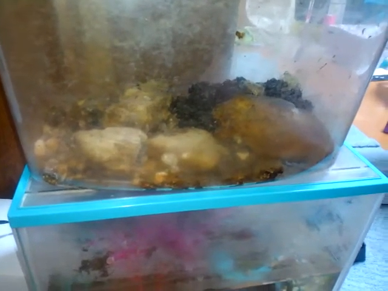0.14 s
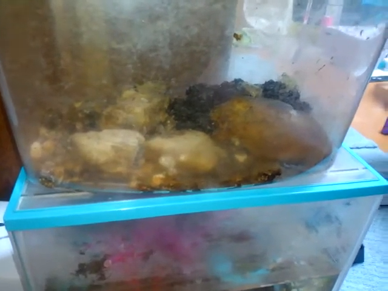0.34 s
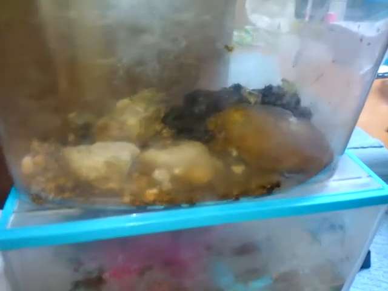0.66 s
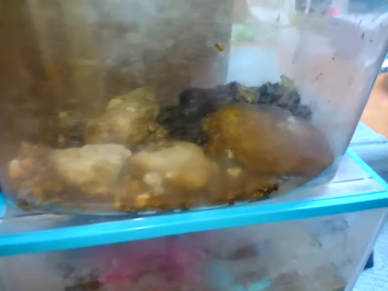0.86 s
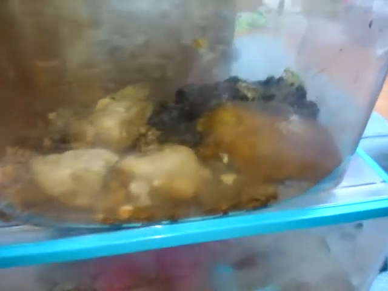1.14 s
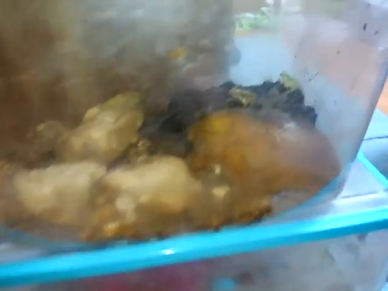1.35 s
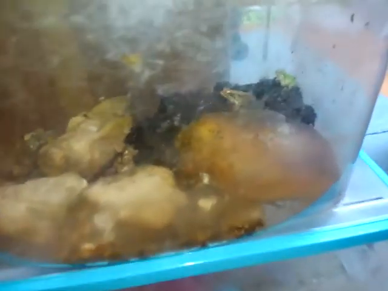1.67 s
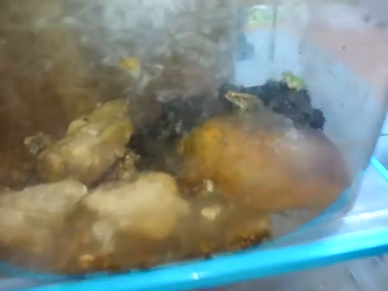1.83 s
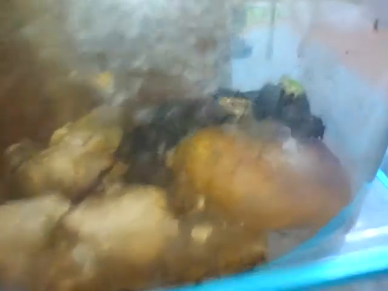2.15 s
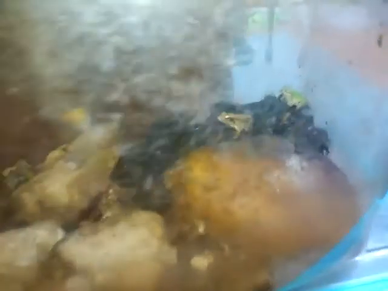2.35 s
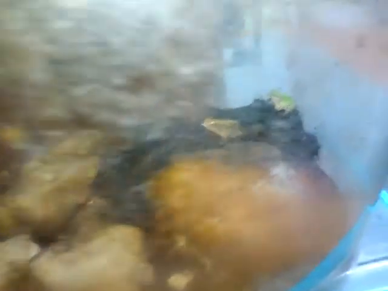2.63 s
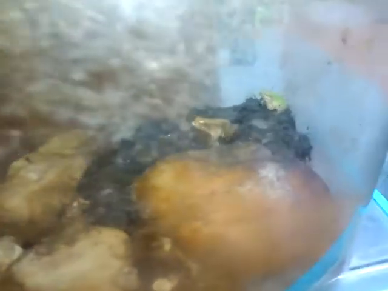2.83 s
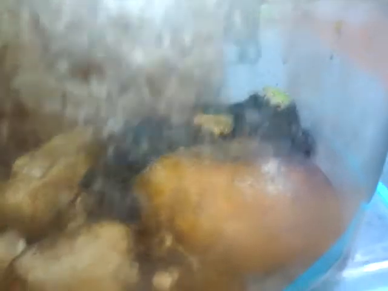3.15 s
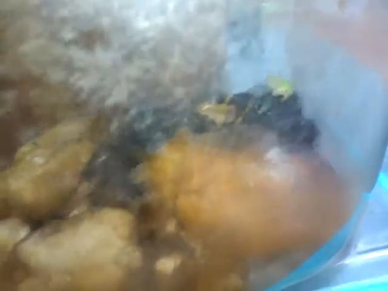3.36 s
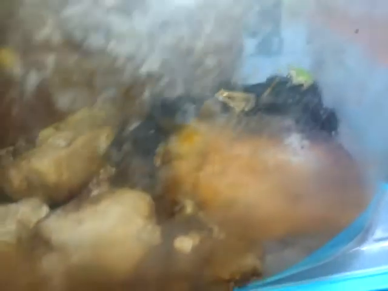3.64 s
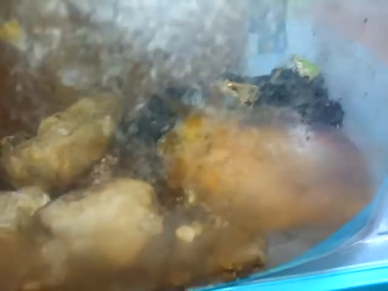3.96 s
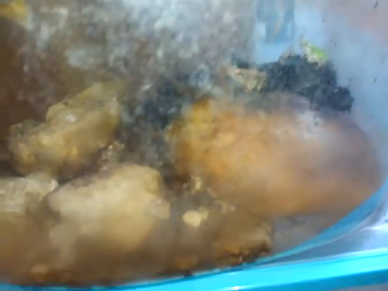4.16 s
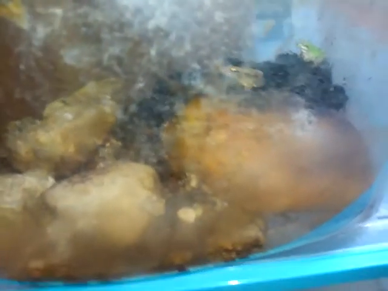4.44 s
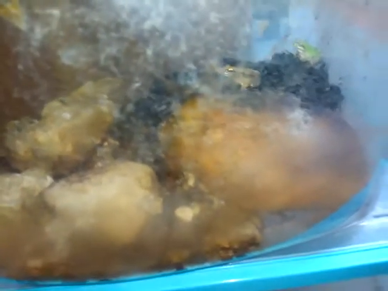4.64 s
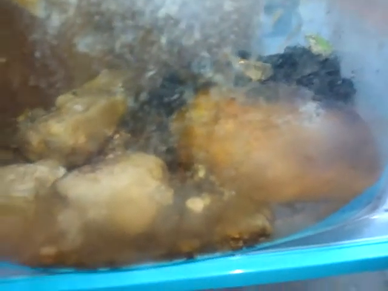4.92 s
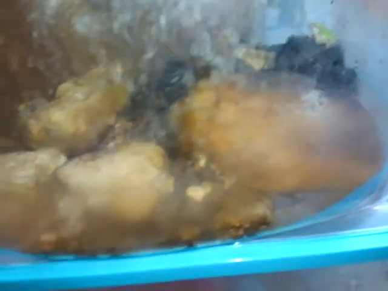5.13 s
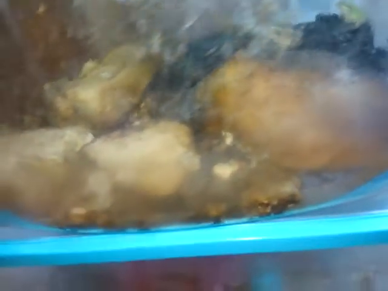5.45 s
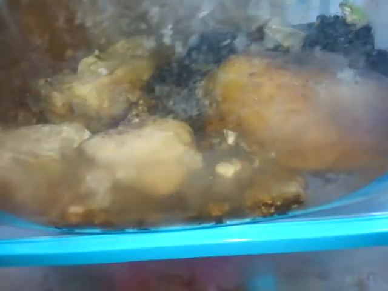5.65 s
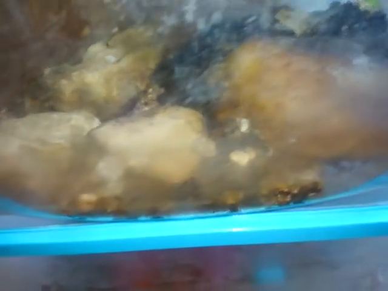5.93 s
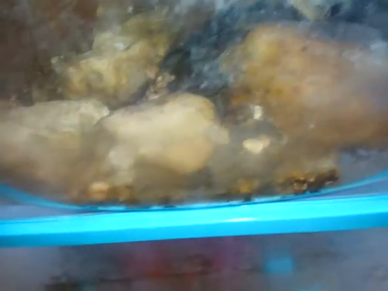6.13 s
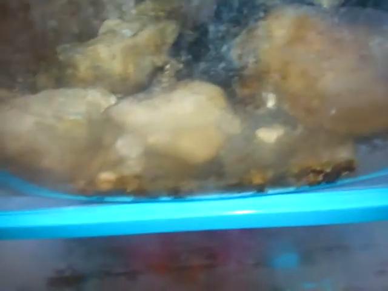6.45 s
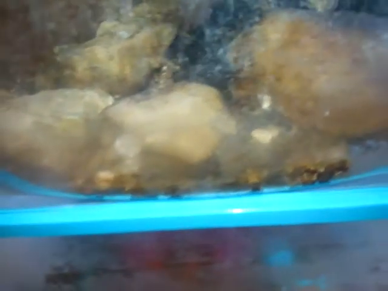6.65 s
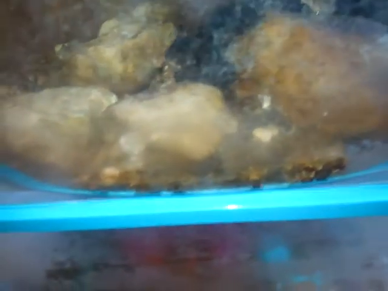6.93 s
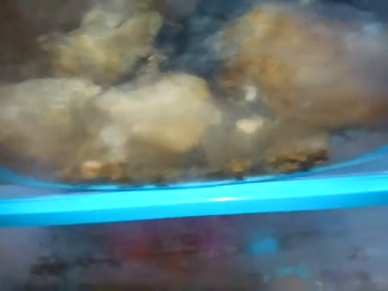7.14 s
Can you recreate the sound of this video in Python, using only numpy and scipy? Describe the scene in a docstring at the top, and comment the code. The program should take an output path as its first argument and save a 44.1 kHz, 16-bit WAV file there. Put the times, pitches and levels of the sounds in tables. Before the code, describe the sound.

A small cricket chirps close by in a plastic tank in a quiet room, from the first instant to the end at about 7.3 seconds, roughly every quarter second. Each chirp lasts about 0.07 seconds: a rapid run of some dozen pulses near 7.3 kilohertz that swells, slows and droops in pitch, with a dry scratchy rasp above and short echoes. Chirps are strong at first, loudest around 1.2, weaker from 1.7 to 3.0, strong again from 3.3 to 5, then mostly softer after 6. The hand-held microphone gets dull low bumps, notably at 0.6, 1.1 to 1.7, 2.0, 2.6, 3.8 and 4.6, and one light hollow plastic knock at 1.2. Tiny dry ticks fall near 2.0, 4.3 and 5.6. A very faint wavering insect trill, chorus and high buzz sit under steady, soft, low room noise.

```python
"""Small cricket in a plastic tank, quiet room

The cricket chirps about four times a second: each chirp is a quick run of wing pulses that swells,
slows and sags in pitch, with a dry rasp of filtered noise above it and echoes off tank and room.
Far insects hold a wavering trill, a chorus and a high buzz, all narrow bands of noise. The hand-held
microphone picks up soft bumps, one ringing knock and a few noise ticks, over steady room noise."""
import sys
import numpy as np
from scipy import signal
from scipy.fft import rfft, irfft
from scipy.io import wavfile

SR = 44100
rng = np.random.default_rng(int(sys.argv[2]) if len(sys.argv) > 2 else 0)


def dump(signal):
    """Clip the signal to [-1, 1] and save it as 16-bit WAV at the path in sys.argv[1]."""
    limited = np.clip(np.atleast_2d(signal).T, -1, 1)
    pcm = np.round(limited * 32767).astype(np.int16)
    wavfile.write(sys.argv[1], SR, pcm)


N = 321489

# colour of the treble that differs between left and right: (frequency [Hz], relative level [dB])
WIDTH = [(2500, -45), (5000, -3), (7200, 8), (9000, 10), (10500, 13), (11700, 9), (13000, -5)]


def cricket(rasp_room_db=-5, rasp_side_db=-13.0, late_side_db=-21):
    """Chirps, heard directly and off the walls; only the rasp and the late echoes have any width."""
    # one row a chirp: (time [s], length [s], direct level [dB], pitch fall [Hz])
    chirps = [(-.034, .066, -30.5, 310), (.2357, .070, -29, 370), (.4883, .070, -29.5, 390),
              (.735, .066, -30.5, 255), (.999, .073, -30, 350), (1.2372, .066, -27.5, 255),
              (1.4554, .066, -29.5, 250), (1.6992, .077, -33, 410), (1.967, .072, -36.5, 495),
              (2.227, .069, -39, 460), (2.4676, .069, -37.5, 380), (2.7583, .067, -34, 345),
              (3.0334, .072, -38, 370), (3.3232, .070, -31.5, 335), (3.597, .071, -30.5, 290),
              (3.849, .070, -30, 290), (4.113, .072, -32, 345), (4.3658, .068, -34, 510),
              (4.6327, .067, -29.5, 300), (4.8896, .065, -30.5, 380), (5.1384, .067, -35.5, 460),
              (5.4145, .068, -34, 440), (5.675, .066, -32.5, 440), (5.9273, .064, -31, 285),
              (6.1776, .077, -35.5, 450), (6.4272, .069, -37.5, 485), (6.6912, .063, -37, 300),
              (6.9438, .074, -36.5, 335), (7.217, .080, -35, 280)]
    # colour of the scraping file: (frequency [Hz], relative level [dB])
    rasp_colour = [(2500, -63), (4200, -19), (5650, -18.5), (6200, -5), (7650, 4), (8150, 0), (8550, 0),
                   (8950, -5.5), (9500, 4), (10400, -1.5), (11000, -3.5), (11700, -11.5), (13000, -25)]
    # the same for every chirp
    rasp_level_db, room_db, twin_db = -50.5, -40.3, -45.3
    room_t60 = 0.19  # s
    pulses_per_s = 240  # at the start of every stroke

    mid, side = np.zeros(N), np.zeros(N)
    # the close walls give every rasp the same fine ring
    tank = amp(-6) * echoes(0.066, 0.0003)
    tank[0] = 1
    for s, length, near_db, fall_hz in chirps:
        crest, pitch_hz = stroke(s, length, near_db, fall_hz)
        tone, twin, scraping = chirp(length, crest, pulses_per_s, pitch_hz, fall_hz)
        twin = amp(twin_db) * twin
        rasp = amp(rasp_level_db) * coloured(passed(scraping, tank), rasp_colour)
        thrown = amp(room_db) * tone + amp(-6) * twin  # what reaches the walls

        start = s - .004  # chirp() begins 4 ms before its first pulse centre
        add(mid, start, amp(near_db) * tone + twin)
        add(mid, start, rasp)
        # the room's echoes change from chirp to chirp as the microphone moves
        add(mid, start, passed(thrown, echoes(room_t60, 0.0026)))
        add(mid, start, amp(rasp_room_db) * passed(rasp, echoes(room_t60, 0.0017)))
        rasp_width = coloured(passed(rasp, echoes(0.052, 0.00035)), WIDTH)
        add(side, start, amp(rasp_side_db) * rasp_width)
        add(side, start, amp(late_side_db) * passed(thrown, echoes(room_t60, .035)))
    return np.array([mid + side, mid - side])


def stroke(s, length, level_db, fall_hz):
    """Crest and pitch of a chirp: strong strokes crest later, long ones earlier; pitch sinks with time."""
    # an ordinary chirp, against which the others are reckoned
    usual_s, usual_db, usual_fall_hz = .069, -33, 365
    # loudest point as a share of the length, moved per dB and per second
    crest = .54 + .012 * (level_db - usual_db) - 17 * (length - usual_s)
    # the pitch sinks 7 Hz per second of song; a chirp that falls further also starts lower
    pitch_hz = 7380 - 7 * s - .24 * (fall_hz - usual_fall_hz)
    return crest, pitch_hz


def chirp(length, crest, rate, pitch_hz, fall_hz):
    """One chirp as (tone, second wing, scraping): every pulse rings both wings briefly and rubs the file."""
    slowing, sag = .013, 3.92  # pulse spacing growth per pulse; power of the late pitch fall
    droop_hz, scatter_hz, twin_hz = 55, 50, 520  # steady fall each way, pulse detuning, second wing below
    uneven_db, slip = 1.0, 0.2  # pulse strength and phase (turns), one standard deviation
    scrape, touch = 0.45, 0.099  # power from pressure to rubbing; pressure at the start

    t = np.arange(-.004, length + .02, 1 / SR)
    k = np.arange(20)
    centres = (k + slowing * k ** 2) / rate  # the pulses spread out through the stroke
    # the wings touch lightly, press harder up to the crest, and part quickly
    press_points = [0, .12, np.clip(crest, .2, .95), .97, 1.06]
    pressures = np.interp(centres / length, press_points, [touch, .2, 1, .8, 0])
    steady_droop = droop_hz * (1 - 2 * t / length)
    late_fall = fall_hz * np.clip(t / length, 0, 1) ** sag
    turns = np.cumsum(pitch_hz + steady_droop - late_fall) / SR

    tone, twin, rub = np.zeros((3, len(t)))
    chances = rng.standard_normal((len(k), 6))
    for n, centre, pressure, chance in zip(k, centres, pressures, chances):
        force, shift, detune, lag, stray, grip = chance
        age = t - centre
        progress = centre / length
        swell = np.cos(np.pi / 2 * np.clip(age * rate / .53, -1, 1))
        # the phase flips at every dip, and slips a little
        ring = np.sin(2 * np.pi * (turns + n / 2 + slip * shift + scatter_hz * detune * age))
        tone += pressure * amp(uneven_db * force) * swell * ring
        # the other wing rings lower and less steadily, mostly late in the stroke
        low_ring = np.sin(2 * np.pi * (lag + (pitch_hz - twin_hz + 140 * stray) * age))
        twin += pressure * progress * swell * low_ring
        rub_force = pressure ** scrape * amp(2.2 * grip - 6 * progress)
        rub += rub_force * np.exp(-(age * rate / 0.58) ** 2)
    # single teeth snag, about 4000 a second
    teeth = rng.standard_normal(len(t)) * (rng.random(len(t)) < 4000 / SR)
    parts = (tone, twin, rub * teeth)
    return [part * np.sqrt(length * SR) / np.linalg.norm(part) for part in parts]


def echoes(t60, delay):
    """A dense tail of reflections with energy 1, setting in after the delay."""
    t = np.arange(int(.35 * SR)) / SR
    onset = np.clip(t / delay - 1, 0, 1)
    tail = rng.standard_normal(len(t)) * amp(-60 * t / t60) * onset
    return tail / np.linalg.norm(tail)


def handling():
    """Dull bumps of the hand on the microphone, a light knock on plastic and a few dry ticks."""
    # soft bumps: (time [s], peak level [dB], pitch [Hz])
    bumps = [(.4, -46.5, 70), (0.585, -38, 65), (1.121, -44.5, 55), (1.168, -44.5, 60), (1.281, -38, 191),
             (1.442, -44, 64.6), (1.663, -42, 52), (2.025, -37.5, 180), (2.607, -41, 65.5),
             (3.845, -44, 49.4), (4.599, -41.5, 60)]
    # what the knocked plastic rings with: (frequency [Hz], relative level [dB], 60 dB decay [s])
    knock_modes = [(556, 4, 0.1), (950, 2, .08), (1190, -8, 0.045), (1530, -7, .025), (2120, -3, 0.018)]
    # colour of the scuff in the knock: (frequency [Hz], relative level [dB])
    scuff_colour = [(300, -4), (900, 0), (2200, -5), (3600, -8), (5000, -20)]
    # faint ticks: (time [s], starting level [dB], decay to 1/e [s])
    ticks = [(1.967, -55, 0.009), (4.286, -54, .012), (4.331, -59, 0.014), (5.595, -54, 0.013),
             (5.612, -61, .01)]
    # colour of the ticks: (frequency [Hz], relative level [dB])
    tick_colour = [(2000, -30), (4500, 3), (8000, -6), (10500, 7), (13000, -9)]
    knock_s, knock_db, scuff_db = 1.207, -51, -52.5

    out, t = np.zeros(N), np.arange(SR // 8) / SR
    lead = t[-1] / 2
    for s, db, hz in bumps:
        swing = 2 * np.pi * hz * (t - lead)
        push_and_pull = swing * np.exp((1 - swing ** 2) / 2)
        add(out, s - lead, amp(db) * push_and_pull)

    ring = np.zeros(len(t))
    for hz, db, t60 in knock_modes:
        ring += amp(db - 60 * t / t60) * np.sin(2 * np.pi * hz * t)
    contact = rng.standard_normal(len(t)) * np.exp(-t / 0.0064)
    knock = signal.fftconvolve(contact, ring)
    add(out, knock_s, amp(knock_db) * knock / knock[:SR // 50].std())  # level over its first 20 ms
    add(out, knock_s, amp(scuff_db) * np.exp(-t / 0.014) * noise(scuff_colour, len(t)))

    for s, db, decay in ticks:
        add(out, s, amp(db) * np.exp(-t / decay) * noise(tick_colour, len(t)))
    return out


def far_insects(trill_db=3.0):
    """A wavering trill, blurred by echoes into a noise band, a lower chorus that grows, and a high buzz."""
    # start and end of the trill and buzz, joined by straight lines:
    # (time [s], trill pitch [Hz], trill level before trill_db is added [dB], buzz level [dB])
    trill_course = [(0.0, 5295, -68.5, -73), (7.29, 5270, -72.5, -78.5)]
    s, pitch_hz, level_db, buzz_db = np.transpose(trill_course)
    t = np.arange(N) / SR
    wander_hz, swell_db, buzz_swell_db = 15 * drift(4), 1.8 * drift(3), 2.2 * drift(1.5)

    # the band sits at the mean pitch and is shifted by the offset from it
    offset_hz = np.interp(t, s, pitch_hz) - pitch_hz.mean() + wander_hz
    waver = np.exp(2j * np.pi * np.cumsum(offset_hz) / SR)
    blurred = band(pitch_hz.mean(), 130)
    trill = amp(np.interp(t, s, level_db) + trill_db + swell_db) * (blurred * waver).real
    chorus = amp(np.linspace(-70.5, -68.7, N)) * band(5100, 480).real
    buzz = amp(np.interp(t, s, buzz_db) + buzz_swell_db) * band(8580, 1100).real
    return trill + chorus + buzz


def room_air(air_db=-52, wide_db=-74):
    """Steady room noise, alike on both sides, plus a little treble of opposite sign left and right."""
    # colour of the room: (frequency [Hz], relative level per Hz [dB])
    air_colour = [(15, 15), (30, 14.5), (45, 11.5), (85, 11), (125, 2), (160, 9), (225, -0.5), (270, 5.5),
                  (420, -3.5), (510, 1), (620, -3.5), (900, -3.5), (1200, -8.5), (2700, -14.5),
                  (4500, -15.5), (6000, -17.8), (9200, -19.3), (10500, -19), (13000, -24)]
    centre = amp(air_db) * noise(air_colour, N)
    width = amp(wide_db) * noise(WIDTH, N)
    return centre + width * np.array([[1], [-1]])


def amp(db):
    """Decibels to gain."""
    return 10 ** (np.asarray(db) / 20)


def evened(x):
    """Scales to rms 1."""
    return x / np.sqrt(np.mean(x ** 2) + 1e-20)


def add(mix, s, sound):
    """Mixes a sound in at time s, trimming what falls outside."""
    start = round(s * SR)
    sound = sound[max(-start, 0):]
    part = mix[max(start, 0):][:len(sound)]
    part += sound[:len(part)]


def passed(x, response):
    """The sound through a response, at unchanged energy."""
    wet = signal.fftconvolve(x, response)
    return wet * np.linalg.norm(x) / np.linalg.norm(wet)


def coloured(x, colour):
    """Filters by a spectrum given as (Hz, dB) points, at unchanged energy."""
    hz, db = np.transpose(colour)
    bins_hz = np.fft.rfftfreq(len(x), 1 / SR) + 1  # 1 Hz up keeps the logarithm finite
    gain = amp(np.interp(np.log(bins_hz), np.log(hz), db))
    return evened(irfft(rfft(x) * gain, len(x))) * np.sqrt(np.mean(x ** 2))


def noise(colour, size):
    """Coloured noise of about rms 1."""
    return coloured(rng.standard_normal(size), colour)


def band(centre_hz, width_hz):
    """A narrow band of noise as a complex signal whose real part has rms 1."""
    hz = np.fft.fftfreq(N, 1 / SR)
    gain = 1 / (1 + (2 * (hz - centre_hz) / width_hz) ** 2) ** 2
    narrow = np.fft.ifft(np.fft.fft(rng.standard_normal(N)) * gain).real
    return signal.hilbert(evened(narrow))


def drift(top_hz):
    """A slow random curve of rms 1: twelve sines of random phase, the slower ones larger."""
    t = np.arange(N) / SR
    curve = np.zeros(N)
    for hz in np.geomspace(.3, top_hz, 12):
        curve += np.sin(2 * np.pi * (hz * t + rng.random())) / np.sqrt(hz)
    return evened(curve)


def scene():
    """The cricket close by, over handling sounds, far insects and the quiet room."""
    return cricket() + handling() + far_insects() + room_air()


def record(dry):
    """The recorder's band limit: a steep low-pass at 13090 Hz."""
    low_pass = signal.firwin(801, 13090, window=("kaiser", 9), fs=SR)
    return signal.oaconvolve(dry, low_pass[None], "same")


dry = scene()
out = record(dry)
dump(out)
```